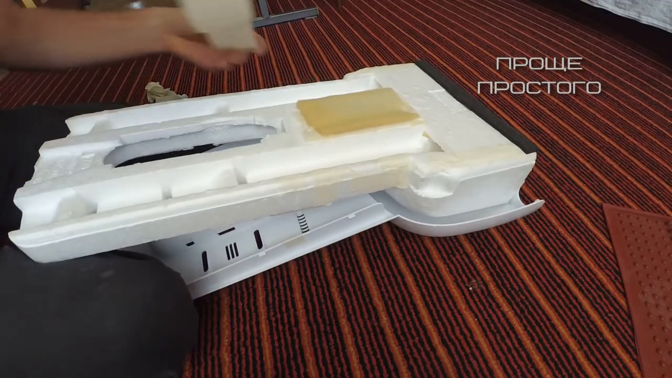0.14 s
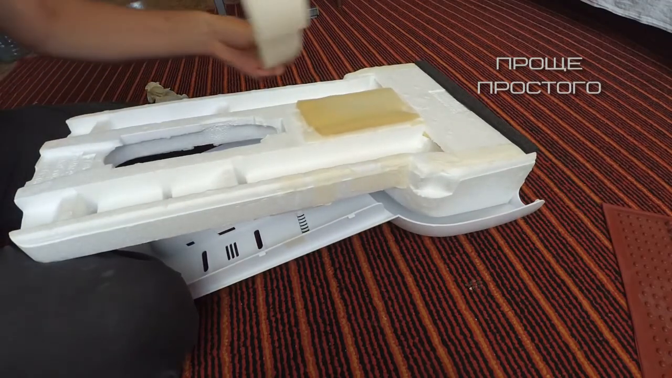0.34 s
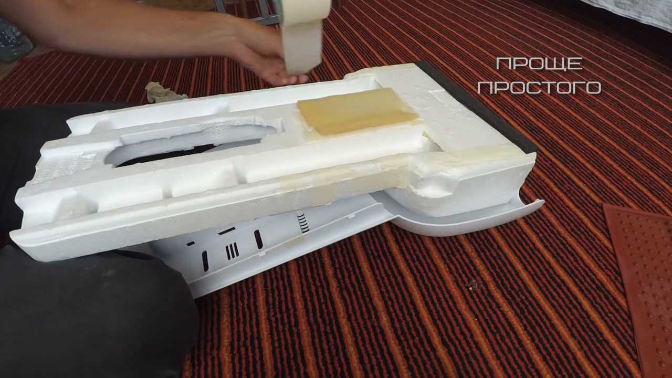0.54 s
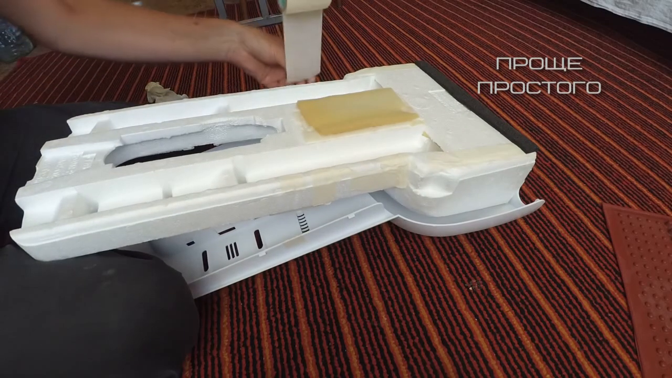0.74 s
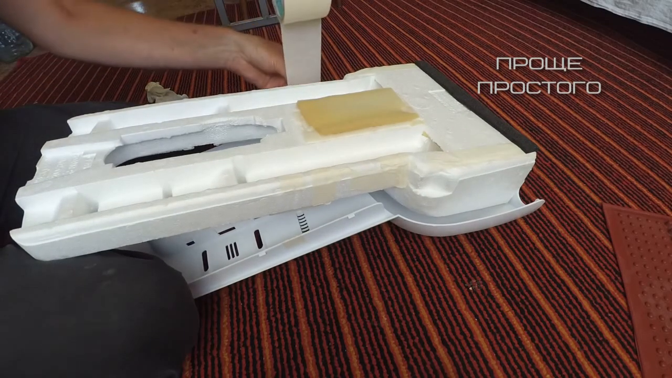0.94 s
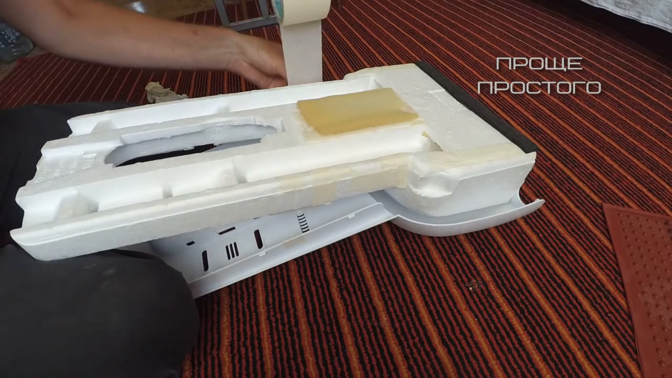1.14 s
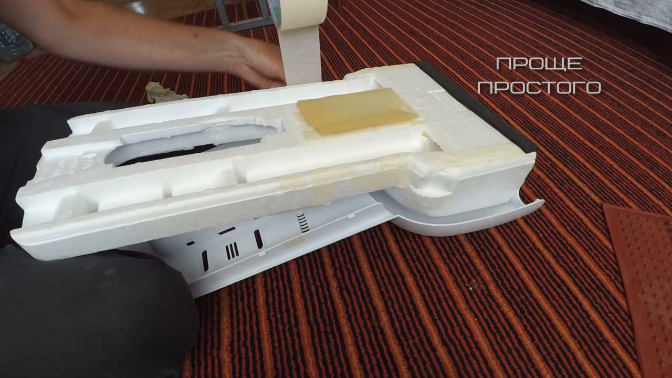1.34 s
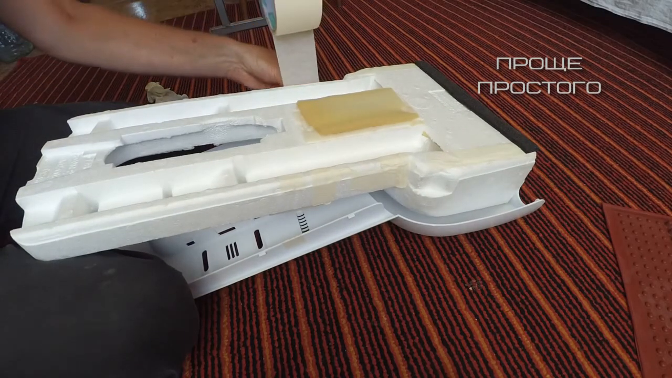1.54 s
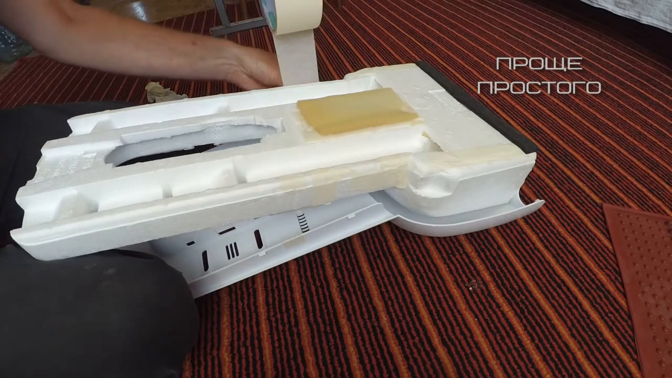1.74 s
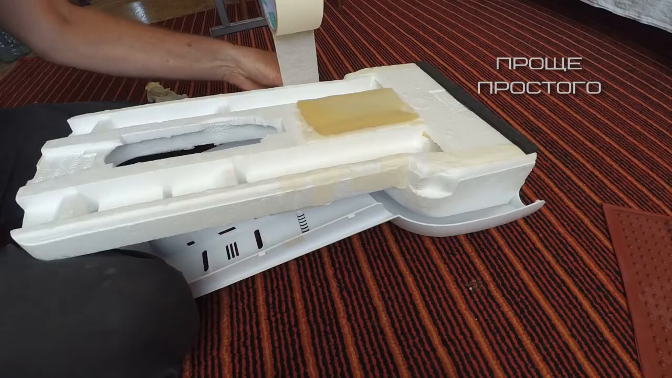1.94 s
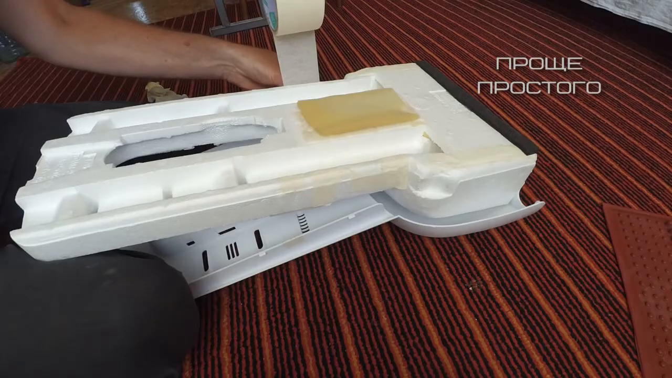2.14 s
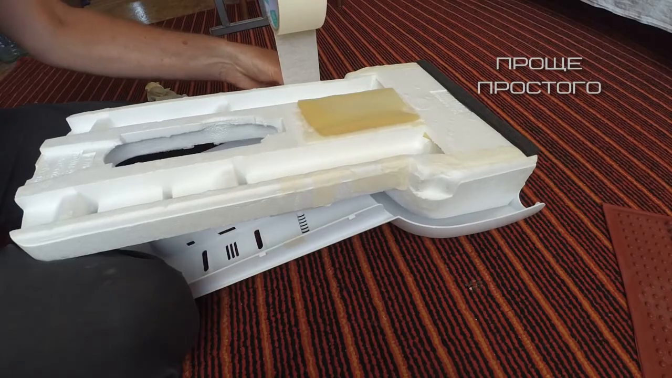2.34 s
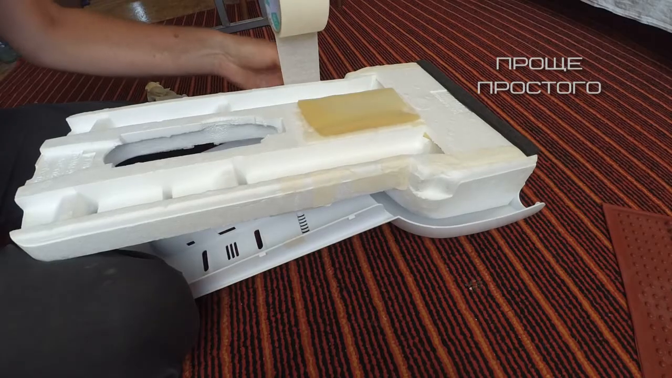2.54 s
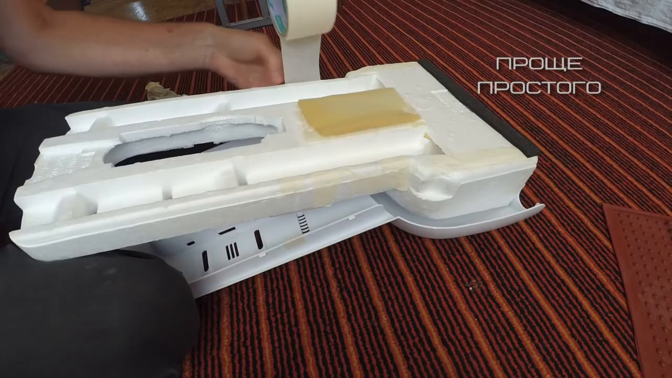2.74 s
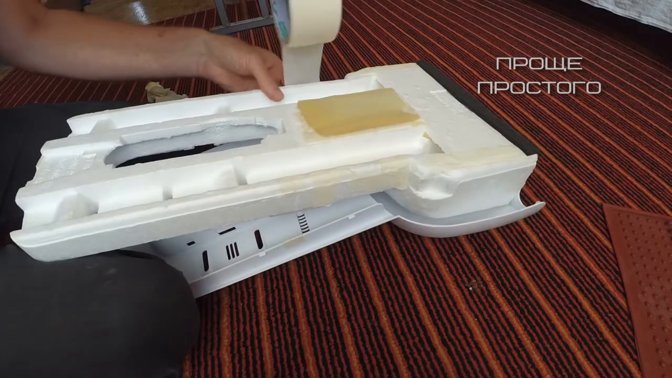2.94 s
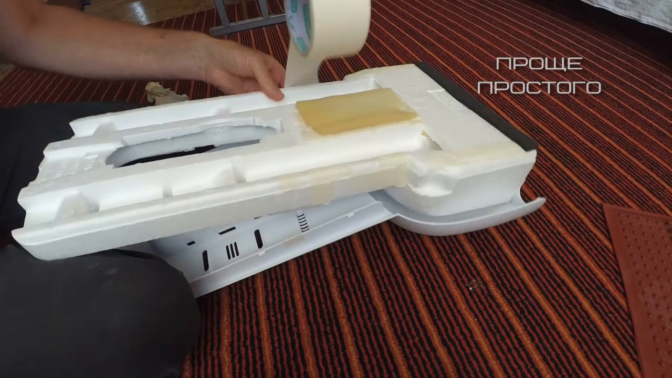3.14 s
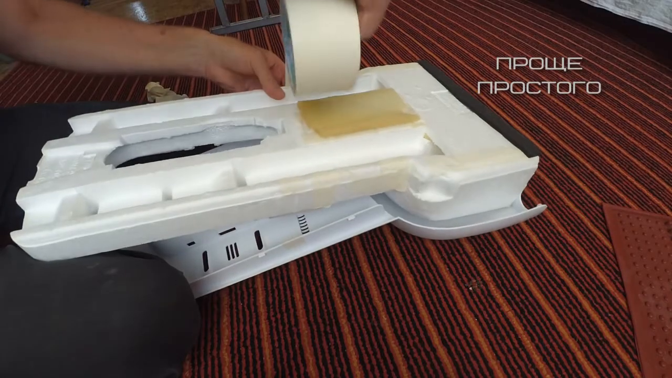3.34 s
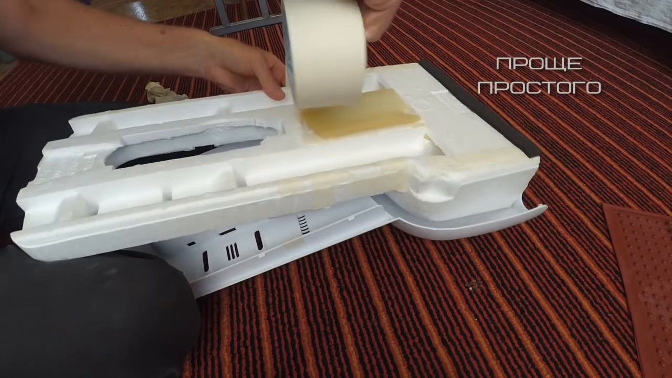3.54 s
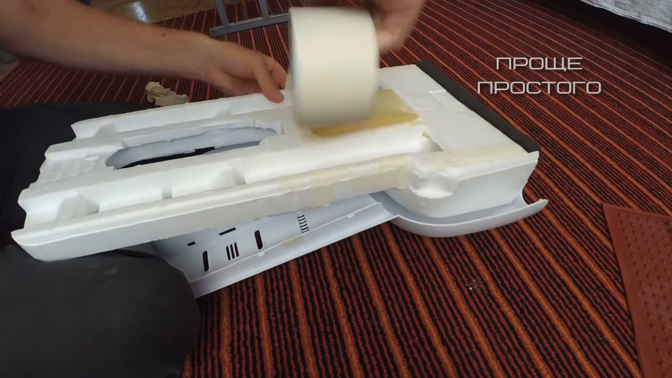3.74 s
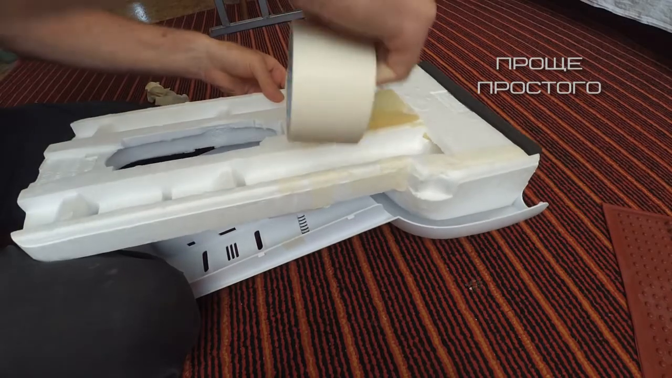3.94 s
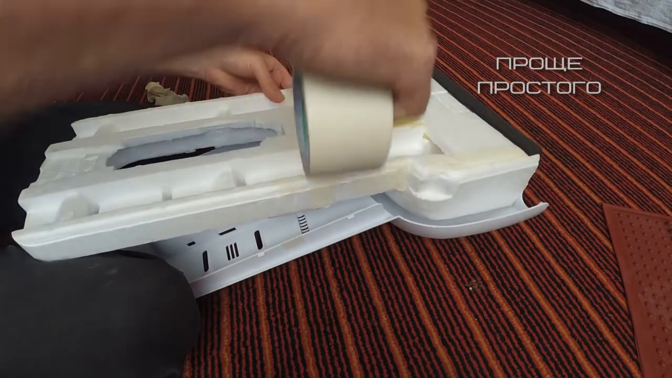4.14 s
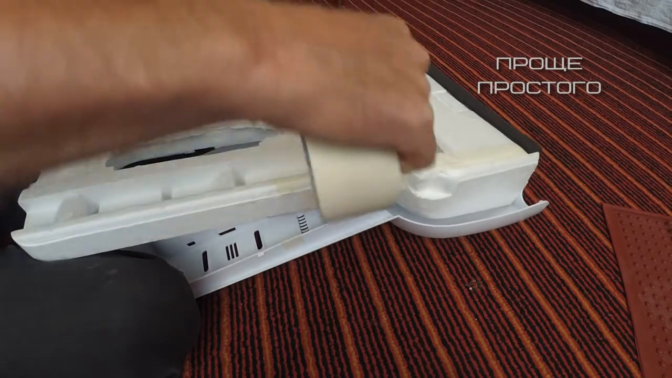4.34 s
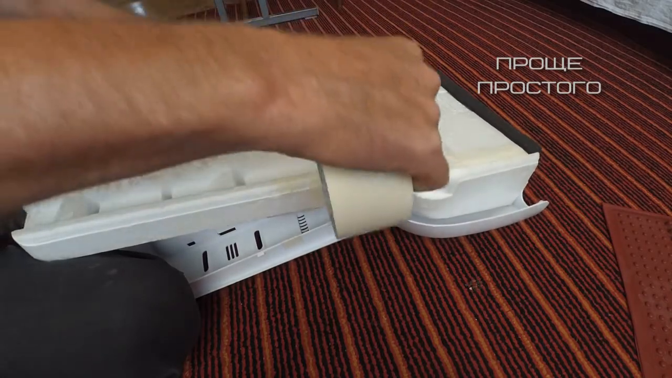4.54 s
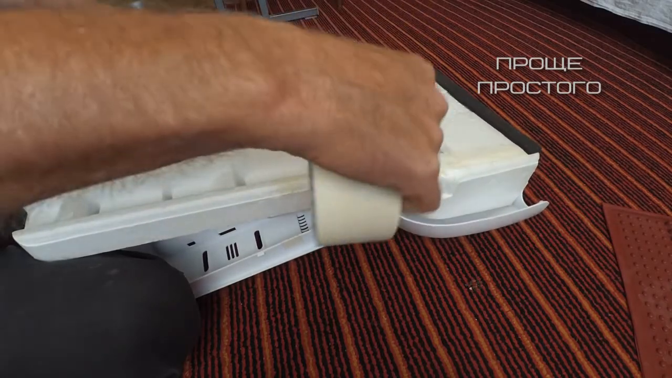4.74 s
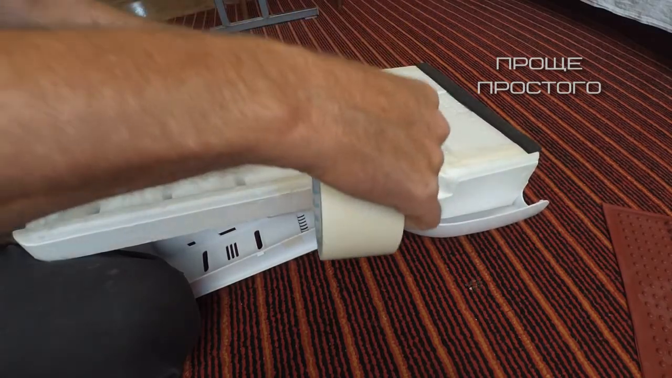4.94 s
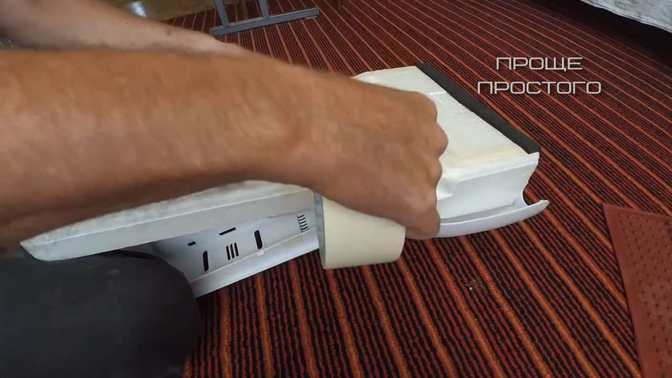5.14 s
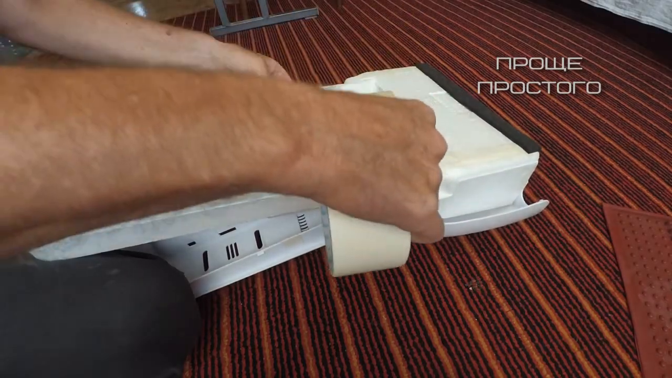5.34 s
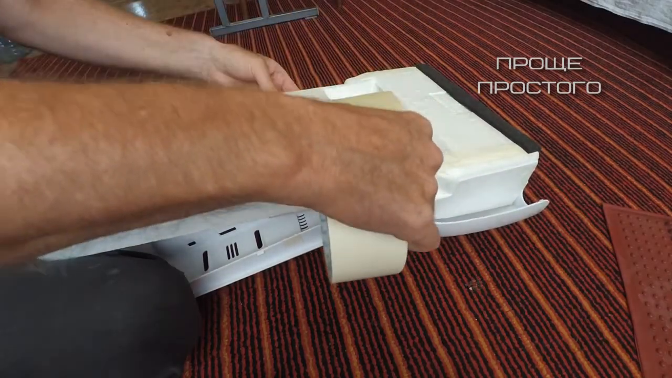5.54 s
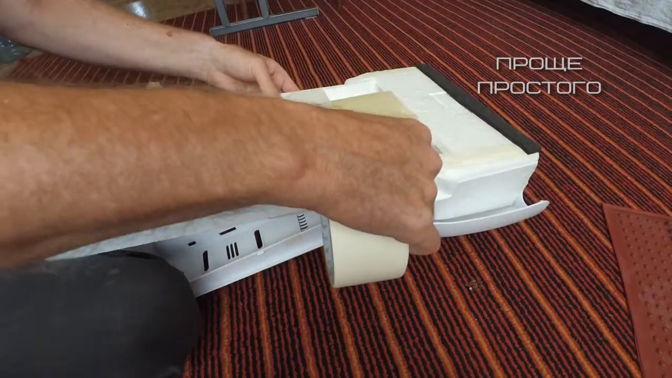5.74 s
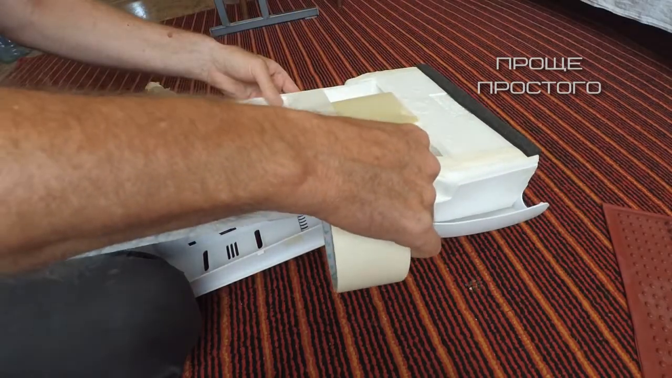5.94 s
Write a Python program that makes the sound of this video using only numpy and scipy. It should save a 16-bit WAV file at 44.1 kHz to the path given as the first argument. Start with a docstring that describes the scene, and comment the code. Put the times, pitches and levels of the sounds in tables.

```python
"""Fingers rub paper tape down on a plastic panel in a small quiet room, over a low rumble, airy rush and hum.
The rubbing is filtered noise and tiny bursts; the glue adds small snaps, and a brief scrape rises in colour.
Then masking tape comes off its roll close by in five quick rips, a light one first: the glue holds and slips,
and each slip cracks and, after the light rip, plucks the taut strip and the card roll as dying tones.
The loudest slips overload the microphone; the panel rings, then the tape is rubbed down and the glue ticks."""
import sys
import numpy as np
from scipy import signal
from scipy.fft import rfft, irfft
from scipy.io import wavfile

SR = 44100
rng = np.random.default_rng(int(sys.argv[2]) if len(sys.argv) > 2 else 0)


def generate_wav(sig):
    """Save sig (samples, or channels by samples) to the path in sys.argv[1] as 16-bit PCM at SR."""
    pcm = np.round(np.clip(np.atleast_2d(sig).T, -1, 1) * 32767).astype(np.int16)
    wavfile.write(sys.argv[1], SR, pcm)


N = 268524
TIME = np.arange(N) / SR  # seconds

# All level_db columns below are relative unless said to be rms; t60_s is the time to die away by 60 dB.
# deep rumble, its spectrum: pitch_hz, level_db
RUMBLE_SPECTRUM = [(3, -19.5), (8, 4.5), (13, 4.5), (20, -13), (35, -16.5), (70, -16.5), (110, -14.5),
                   (160, -27.5), (200, -23), (300, -29), (600, -48), (2000, -61.5)]
# soft rush of air, its spectrum: pitch_hz, level_db
AIR_SPECTRUM = [(100, -10), (300, -8.5), (440, -0.5), (560, 4.5), (680, 3), (750, -4), (830, 0.5),
                (1100, -0.5), (1500, -5), (1900, -11), (2500, -24), (5000, -26.5), (15000, -41)]
# how loud the rush of air is over time: time_s, rms_level_db
AIR_LEVEL = [(0, -65), (1.5, -62.5), (2.8, -58.5), (4.4, -67.5), (6.09, -71)]
# steady tones of the hum, before they waver: pitch_hz, rms_level_db
HUM_TONES = [(108, -66.5), (195, -73.5), (595, -80.5), (680, -82.5), (815, -80.5)]
# faint steady hiss, its spectrum: pitch_hz, level_db
HISS_SPECTRUM = [(100, 4.5), (1000, 1), (2500, -1), (8000, -7.5), (15000, -11.5)]
HISS_DB = -75.5  # rms level

# strokes of rubbing and slow peeling: start_s, hold_s, level_db, treble_over_level_db
STROKES = [(0, 0.048, -44.5, -6), (0.178, 0.017, -54.5, -2.5), (0.302, 0.073, -58.5, -0.5),
           (0.51, .018, -60.5, 3.5), (0.623, 0.0091, -62.5, -2), (1.725, 0.022, -70, -18),
           (2.04, 0.049, -70.5, -21), (2.207, 0.027, -70, -5), (2.391, 0.035, -59.5, -24),
           (2.534, 0.054, -55, 1), (2.711, 0.037, -53, -6), (2.86, 0.062, -55.5, -1.5),
           (2.983, 0.052, -51.5, -1.5), (3.08, 0.02, -33.5, -10), (3.309, 0.066, -47.5, -5.5),
           (3.439, 0.042, -36.5, -5), (3.653, 0.11, -44.5, -6), (3.916, 0.013, -46, -4.5),
           (4.008, 0.081, -35.5, -8.5), (4.61, 0.041, -48, -17), (4.752, .04, -55.5, -17),
           (5.305, 0.12, -61, -9)]
STROKE_RISE_DB_PER_S, STROKE_FALL_DB_PER_S = 330, 292
# light contact of fingers and tape between the strokes: time_s, level_db
CONTACT_LEVEL = [(0, -74), (.7, -71), (1.45, -80.5), (1.6, -77.5), (1.9, -78), (2.8, -68), (3.25, -59.5),
                 (3.8, -53), (4.52, -49.5), (4.95, -56.5), (5.7, -65.5), (5.97, -66.5), (6.03, -72.5)]
CONTACT_TREBLE_DB = -9.5  # relative to the contact level
# rubbed paper, its spectrum: pitch_hz, level_db
PAPER_SPECTRUM = [(150, -9), (600, -5), (1500, -3), (2100, -2), (3200, -1.5), (4500, 0), (7000, -1.5),
                  (9000, -4.5), (12000, -11), (16000, -16)]
# faint resonances of rubbed paper: pitch_hz, width_hz, level_db
PAPER_PEAKS = [(2766, 180, -9), (4070, 190, -7), (5500, 220, -5.5), (9340, 130, -6)]
# how strongly the stretched strip colours the rubbing: time_s, level_db
STRIP_COLOUR = [(0, -35), (1.5, 11), (2.4, 9), (3.0, -13), (3.35, -1.5), (4.25, 1.5), (4.7, -12.5),
                (6.09, -4)]
# reflection of the rubbing off hand or panel: time_s, comb_spacing_hz
RUB_REFLECTION = [(0, 2760), (.5, 2900), (2.4, 1016), (3.2, 1520), (4.8, 996)]
REFLECTION_GAIN = 0.2
HISS_OVER_CRACKLE_DB = 4.5

# small snaps of glue and paper: start_s, level_db, tilt_above_1_khz_db_per_octave
SNAPS = [(0.1862, -29, 1.5), (0.497, -36, 9), (.598, -44, 1), (0.867, -44, 16), (.983, -43.5, 8.5),
         (1.0783, -36, -1.5), (2.0164, -27, -6), (3.0975, -3.5, 4.5), (3.1048, -12.5, -3),
         (3.3904, -15, 1.5), (3.4402, -19, -1), (3.6473, -23.5, 1.5), (3.911, -25, -2), (3.9707, -25, 2.5),
         (4.0055, -16, -4), (4.2632, -15, -4), (4.530, -20.5, -2), (4.605, -31, -1), (4.943, -34, 0),
         (4.786, -28.5, 0), (5.4339, -35, 2), (5.9214, -39.5, 0)]
# one snap, its spectrum: pitch_hz, level_db
SNAP_SPECTRUM = [(100, -18), (600, -10.5), (1500, -2), (2300, -5), (3500, -0.5), (6500, -3), (9000, -8.5),
                 (12000, -21.5), (16000, -23.5)]
# the first, light rip is a quick fading row of such snaps
LIGHT_RIP_S, LIGHT_RIP_GAP_S = 3.0524, .0055
LIGHT_RIP_DB, LIGHT_RIP_FADE_DB_PER_S, LIGHT_RIP_TILT_DB_PER_OCTAVE = -18.5, 112, 3

# runs of slips in the other rips:
# start_s, slip_count, first_gap_s, last_gap_s, pluck_db, crack_db, swell_over_run_db
RIP_RUNS = [(3.4472, 9, 0.0033, .0033, -5.5, -6.5, 11.5), (3.68, 8, 0.0061, .0035, -1.5, -2, 2),
            (4.0367, 3, .0054, .0049, -.5, -4.5, -0.5), (4.0808, 2, .0168, .0168, -10.5, -13, -9.5),
            (4.2808, 4, .0243, .0132, 0, -5.5, -3)]
# short tones of the taut strip and card roll, before detuning: pitch_hz, level_db, t60_s
STRIP_MODES = [(193, -23, 0.025), (630, -20.5, 0.012), (977, -13.5, 0.0065), (1457, 0.5, 0.0095),
               (1645, -6, 0.0076), (2260, -23, .006), (2657, -11, .006), (4000, -13, .004)]
# faint long rings of the roll and the room: pitch_hz, level_db, t60_s
LONG_RINGS = [(240, -51, .25), (366, -53, .28), (644, -38, .2), (817, -41, .2), (867, -39, .2),
              (941, -36, .2), (1052, -40, .2), (1088, -37, .2), (1250, -32, .17), (1362, -32, .18),
              (1573, -34, .15), (1816, -38, .2), (2815, -43, .16)]
# cracking glue, its spectrum: pitch_hz, level_db
CRACK_SPECTRUM = [(100, -13), (450, -6.5), (900, 0.5), (1300, 3.5), (2200, -3), (3000, -2.5), (4100, -2),
                  (5000, -8), (7500, -10.5), (10000, -15.5), (12500, -22.5), (16000, -28.5)]
# first echoes of a rip, from the panel and the floor: delay_s, level_db
FIRST_ECHOES = [(.0032, -19.5), (.0064, -21.5)]

# tones of the tugged plastic panel: pitch_hz, level_db, t60_s
PANEL_MODES = [(124, -39, .55), (203, -52, .7), (367, -40, 0.49)]
PANEL_S = 4.3054  # when the panel starts to ring
# pressing the tape down makes the glue tick at random; ticks past the end of the sound are not heard
PRESS_FROM_S, PRESS_TO_S, TICK_OVER_CONTACT_DB, TICK_SPREAD_DB = 4.56, 6.7, 10, 1.5

# how the room rings: pitch_hz, t60_s, level_db
ROOM_RING = [(130, .42, -3), (240, .38, 3), (400, .33, -3), (900, .3, 2), (1400, .27, -2), (2200, .27, 1.5),
             (4000, .26, -1), (7300, .23, 0), (15000, .16, -2)]
# stereo spread: pitch_hz, level_db
STEREO_SPREAD = [(100, -60), (3300, -62), (4400, -27), (6000, -20), (8500, -13), (12000, -7), (16000, -5)]
EDGE_HZ = 15520  # upper band limit


def amp(db):
    """Turns decibels into gain."""
    return 10 ** (np.asarray(db) / 20)


def unit(x):
    """Scales a sound to rms 1."""
    return x / np.sqrt(np.mean(x ** 2) + 1e-20)


def read(points, hz):
    """Reads a table of pitches, in even steps of pitch rather than of hertz."""
    f, value = np.transpose(points)
    return np.interp(np.log(hz + 1), np.log(f + 1), value)


def curve(rows):
    """Reads a time table at every sample."""
    return np.interp(TIME, *np.transpose(rows))


def add(mix, s, sound):
    """Mixes a sound in at time s."""
    part = mix[max(round(s * SR), 0):][:len(sound)]
    part += sound[:len(part)]


def colour(x, spectrum, tilt_db=0, size=8192):
    """Filters forward in time with unit energy; the tilt, in dB an octave, acts above 1 kHz."""
    hz = abs(np.fft.fftfreq(size, 1 / SR))
    level_db = read(spectrum, hz) + tilt_db * np.log2(np.maximum(hz, 1000))
    log_gain = np.log(amp(level_db))
    # this phase puts the filter's energy as early as possible
    response = np.exp(np.conj(signal.hilbert(log_gain)))
    taps = np.fft.ifft(response).real[:size // 2]
    return signal.oaconvolve(x, taps / np.linalg.norm(taps))[:len(x)]


def noise(spectrum):
    """Makes steady noise of rms 1 with the given spectrum."""
    gain = amp(read(spectrum, np.fft.rfftfreq(N, 1 / SR)))
    return unit(irfft(rfft(rng.standard_normal(N)) * gain, N))


def drift(hz):
    """Makes a random wander of rms 1, fading out above about the given rate."""
    gain = np.exp(-(np.fft.rfftfreq(N, 1 / SR) / hz) ** 2)
    return unit(irfft(rfft(rng.standard_normal(N)) * gain, N))


def burst(life, spectrum, tilt_db=0, size=1024):
    """Many glue threads break in a few milliseconds; energy equals one millisecond at rms 1."""
    u = np.arange(size) / SR / life
    threads = rng.standard_normal(size) * np.sqrt(u) * np.exp(-u)
    x = colour(threads, spectrum, tilt_db, size=size)
    return x / np.linalg.norm(x) * np.sqrt(SR / 1000)


def plucked(modes, t, shift=1, phase=0):
    """A plucked object sounds as a sum of tones, each dying away at its own pace."""
    hz, db, t60 = np.transpose(modes)[:, :, None]
    decay = amp(db) * np.exp(-np.log(1000) * t / t60)
    return (decay * np.sin(2 * np.pi * hz * shift * t + phase)).sum(0)


def background(rumble_db=-50, waver=0.25):
    """Filtered noise makes a deep rumble and a soft rush of air; wavering sine tones make the hum."""
    hum = np.zeros(N)
    for hz, db in HUM_TONES:
        level = amp(db) * np.sqrt(2) * (1 + waver * drift(1.8))
        hum += level * np.sin(2 * np.pi * hz * TIME + drift(9))
    rumble = amp(rumble_db) * noise(RUMBLE_SPECTRUM)
    air = amp(curve(AIR_LEVEL)) * noise(AIR_SPECTRUM)
    return rumble + air + hum


def hiss():
    """A faint steady hiss is noise with a falling spectrum."""
    return amp(HISS_DB) * noise(HISS_SPECTRUM)


def rubbing_gains():
    """Each stroke rises, holds and dies away over the light contact; returns gains of body and treble."""
    body_power = amp(curve(CONTACT_LEVEL)) ** 2
    treble_power = body_power * amp(CONTACT_TREBLE_DB) ** 2
    for start, hold, db, treble_db in STROKES:
        rise_db = STROKE_RISE_DB_PER_S * np.maximum(start - TIME, 0)
        fall_db = STROKE_FALL_DB_PER_S * np.maximum(TIME - start - hold, 0)
        power = amp(db - rise_db - fall_db) ** 2
        body_power = body_power + power
        treble_power = treble_power + power * amp(treble_db) ** 2
    return np.sqrt(body_power), np.sqrt(treble_power)


def rustle(grains_per_s=500, grain_life=0.001, flutter_db=2.2, split_hz=6500, treble_db=5,
           strip_hz=1450, strip_db=-6):
    """Crepe paper rubs and peels: a fine hiss with tiny bursts of cracks also stirs the stretched strip."""
    happens = rng.random(N) < grains_per_s / SR
    sizes = amp(4.5 * np.minimum(rng.exponential(1, N), 3.5)) * happens
    u = np.arange(SR // 100) / SR / grain_life
    grains = unit(signal.oaconvolve(sizes, u * np.exp(-u))[:N])
    strength = (grains + amp(HISS_OVER_CRACKLE_DB)) * amp(flutter_db * drift(32))
    drive = unit(strength * rng.standard_normal(N))

    plain = colour(drive, PAPER_SPECTRUM)
    paper = plain.copy()
    for hz, width, db in PAPER_PEAKS:
        paper += amp(db) * signal.lfilter(*signal.iirpeak(hz, hz / width, SR), plain)
    delay = 1 / curve(RUB_REFLECTION) + 2e-5 * drift(5)  # seconds, wandering slightly
    paper = unit(paper + REFLECTION_GAIN * np.interp(TIME - delay, TIME, paper))

    body = signal.sosfiltfilt(signal.butter(2, split_hz, fs=SR, output="sos"), paper)
    treble = amp(treble_db) * (paper - body)
    strip = unit(signal.lfilter(*signal.iirpeak(strip_hz, 1, SR), drive))
    strip = strip * amp(curve(STRIP_COLOUR) + strip_db)
    body_gain, treble_gain = rubbing_gains()
    return body_gain * (body + strip) + treble_gain * treble


def snaps(life=0.0016, level_db=-8.0, count=7, jitter=0.14):
    """Small dry snaps, too light to pluck the strip: single ones, and the fading row of the first rip."""
    gaps = 1 + jitter * rng.standard_normal(count - 1)
    after = LIGHT_RIP_GAP_S * np.cumsum([0, *gaps])
    row = [(LIGHT_RIP_S + t, LIGHT_RIP_DB - LIGHT_RIP_FADE_DB_PER_S * t, LIGHT_RIP_TILT_DB_PER_OCTAVE)
           for t in after]
    out = np.zeros(N)
    for s, db, tilt_db in SNAPS + row:
        add(out, s, amp(db + level_db) * burst(life, SNAP_SPECTRUM, tilt_db))
    return out


def scrape(start=.285, end=.415, from_hz=2650, to_hz=3100, width_hz=500, level_db=-63):
    """Two bands of noise, one at twice the pitch, give a hollow colour that rises as the hand slides."""
    t = np.arange(0, end - start, 1 / SR)
    turn = np.exp(2j * np.pi * np.cumsum(np.linspace(from_hz, to_hz, len(t))) / SR)
    band = np.zeros(len(t), complex)
    for k in (1, 2):
        wander = (drift(width_hz) + 1j * drift(width_hz))[:len(t)]
        band += turn ** k / k * wander
    out = np.zeros(N)
    add(out, start, amp(level_db) * band.real * signal.windows.tukey(len(t)))
    return out


def slips():
    """Glue lets go at even gaps, or shortening ones as the pull speeds up; yields s, pluck dB, crack dB."""
    for start, count, first_gap, last_gap, pluck_db, crack_db, swell_db in RIP_RUNS:
        count = round(count)
        times = start + np.cumsum([0, *np.geomspace(first_gap, last_gap, count - 1)])
        for s, db in zip(times, swell_db * np.linspace(-.5, .5, count)):
            yield s, pluck_db + db, crack_db + db


def rips(life=0.00097, detune=0.03, pluck_db=2, crack_db=-4, release=0.00043, lead=0.00043,
         tear_life=.004, tear_db=-10, ring_db=2):
    """Threads crack, the slip plucks the strip, whose pitches vary, and loose threads tear after it."""
    out = np.zeros(N)
    t = np.arange(SR // 3) / SR  # time after a slip
    for s, slip_db, snap_db in slips():
        # length and tension of the strip shift its pitches
        shift = 1 + detune * (2 * rng.random((len(STRIP_MODES), 1)) - 1)
        strip = amp(pluck_db) * plucked(STRIP_MODES, t, shift=shift)
        # changing paths to the rings give them random phases
        phase = 2 * np.pi * rng.random((len(LONG_RINGS), 1))
        rings = amp(ring_db) * plucked(LONG_RINGS, t, phase=phase)
        add(out, s, amp(slip_db) * (strip + rings) * (1 - np.exp(-t / release)))
        add(out, s - lead, amp(snap_db + crack_db) * burst(life, CRACK_SPECTRUM))
        add(out, s, amp(snap_db + tear_db) * burst(tear_life, CRACK_SPECTRUM))
    echoes = sum(amp(db) * np.interp(TIME - delay, TIME, out) for delay, db in FIRST_ECHOES)
    return out + echoes


def panel():
    """The last rip tugs the plastic panel, which rings on in low dying tones as it is let go."""
    out = np.zeros(N)
    add(out, PANEL_S, plucked(PANEL_MODES, np.arange(SR) / SR))
    return out


def ticks(count=36, life=0.00087, tilt_db=2):
    """Glue makes tiny snaps under the pressing fingers, louder where the contact is stronger."""
    out = np.zeros(N)
    for where, size in zip(rng.random(count), rng.standard_normal(count)):
        s = PRESS_FROM_S + where * (PRESS_TO_S - PRESS_FROM_S)
        contact_db = np.interp(s, *np.transpose(CONTACT_LEVEL))
        db = contact_db + TICK_OVER_CONTACT_DB + TICK_SPREAD_DB * size
        add(out, s, amp(db) * burst(life, SNAP_SPECTRUM, tilt_db))
    return out


def tail(first=0.001, build=0.0021, size=12):
    """Sparse reflections come from floor, panel and walls; the treble dies first."""
    count = SR // 2 // size
    taps = np.zeros(count * size)
    places = np.arange(count) * size + rng.integers(0, size, count)
    taps[places] = rng.choice([-1, 1], count)
    hz, t, z = signal.stft(taps, SR, nperseg=256)
    table = np.array(ROOM_RING)
    t60 = read(table[:, [0, 1]], hz)[:, None]
    db = read(table[:, [0, 2]], hz)[:, None]
    taps = signal.istft(z * amp(db) * np.exp(-np.log(1000) * t / t60), SR)[1]
    # silent at first, then building up
    taps *= 1 - np.exp(-np.maximum(np.arange(len(taps)) / SR - first, 0) / build)
    return taps / np.linalg.norm(taps)


def room(x, wet_db):
    """Two reflection patterns trade places in a 2 s cycle, as the hands move."""
    turn = 2 * np.pi * TIME / 2
    wet = sum(signal.fftconvolve(x * share, tail())[:N] for share in (np.cos(turn), np.sin(turn)))
    return x + amp(wet_db) * wet


def stereo(x, scattered, count=240, rumble_db=-67):
    """The two channels are alike, but for scattered, mostly top treble and a little rumble."""
    hz = np.fft.rfftfreq(N, 1 / SR)
    phases = np.cumsum(rng.uniform(-np.pi, 0, count))
    scatter = np.interp(hz, np.linspace(0, SR / 2, count), phases)
    side = irfft(rfft(scattered) * amp(read(STEREO_SPREAD, hz)) * np.exp(1j * scatter), N)
    low_pass = signal.butter(2, 90, fs=SR, output="sos")
    side += amp(rumble_db) * signal.sosfilt(low_pass, noise(RUMBLE_SPECTRUM))
    return np.array([x + side, x - side])


def scene(soft_spread_db=-12):
    """Tape in the room, its narrow strip without deep bass, over the background; rips spread widest."""
    soft = room(rustle() + snaps() + scrape() + ticks(), wet_db=-12.5)
    loud = room(rips(), wet_db=-9.0)
    high_pass = signal.butter(2, 100, "high", fs=SR, output="sos")
    tape = signal.sosfilt(high_pass, loud + soft)
    # the rips are spread wider than the soft sounds
    return stereo(background() + hiss() + tape + panel(), loud + amp(soft_spread_db) * soft)


def record(dry, order=6):
    """The loudest slips overload the input, which flattens their peaks; then the top treble is cut."""
    clipped = dry / (1 + abs(dry) ** order) ** (1 / order)
    taps = signal.firwin(401, EDGE_HZ, window=("kaiser", 8), fs=SR)
    return signal.oaconvolve(clipped, taps[None], "same")


dry = scene()
out = record(dry)
generate_wav(out)
```